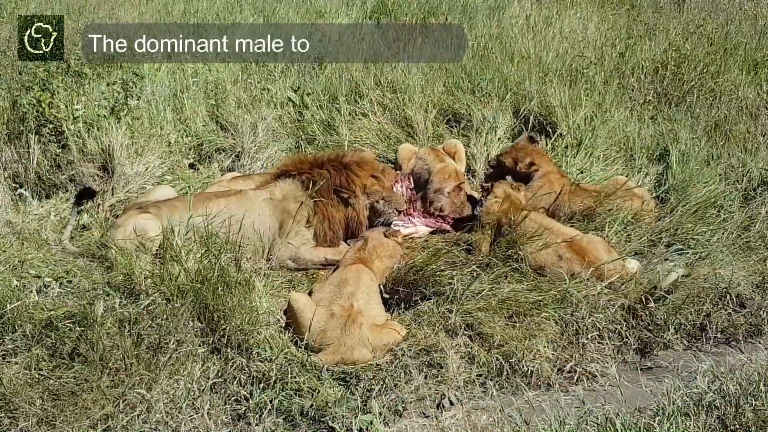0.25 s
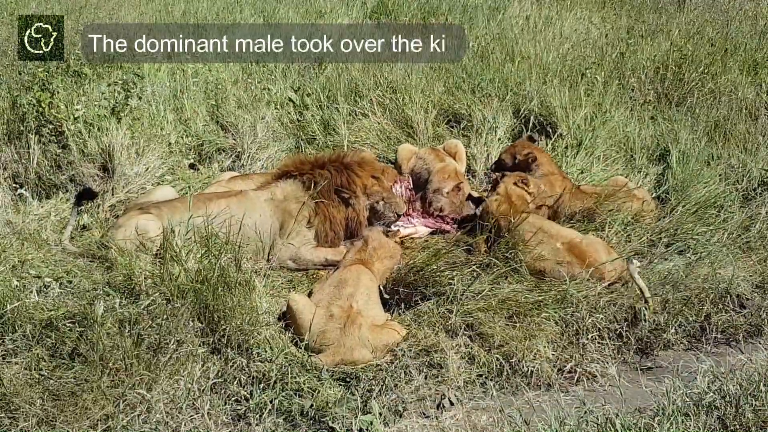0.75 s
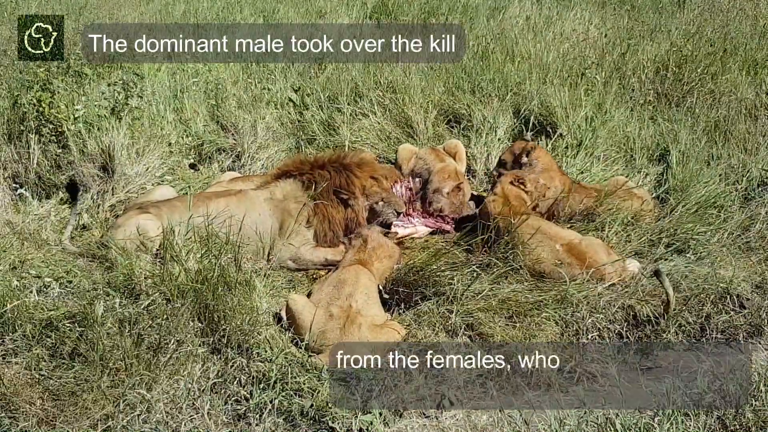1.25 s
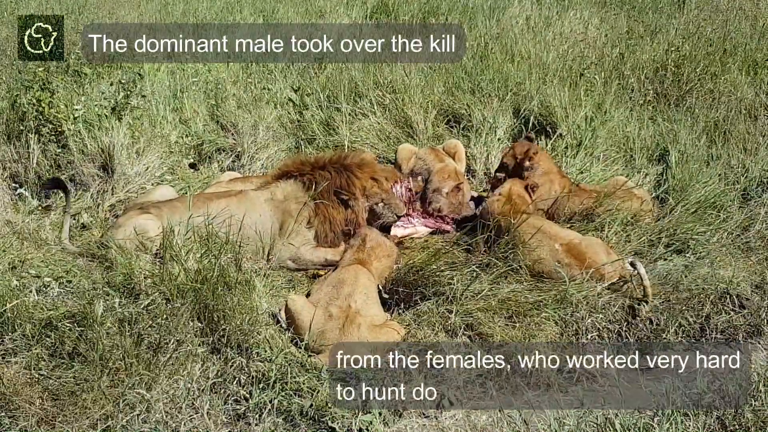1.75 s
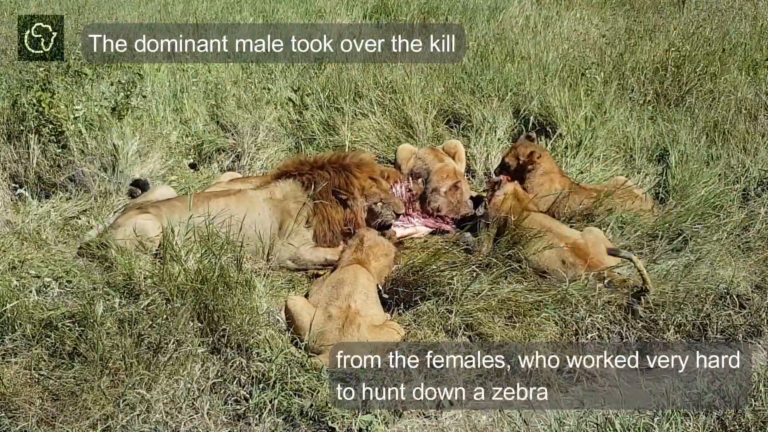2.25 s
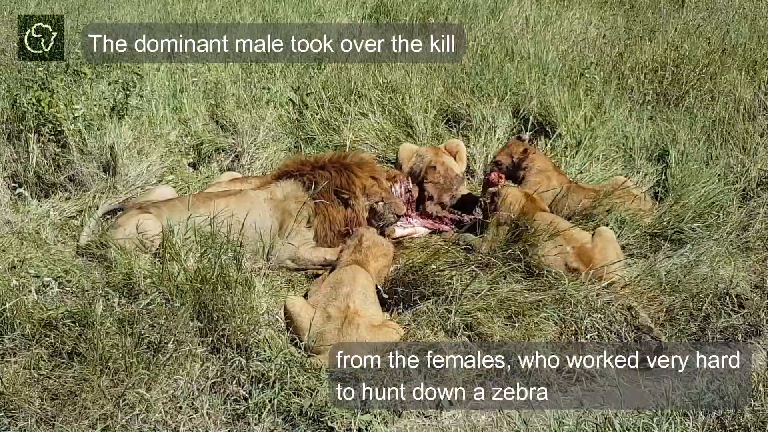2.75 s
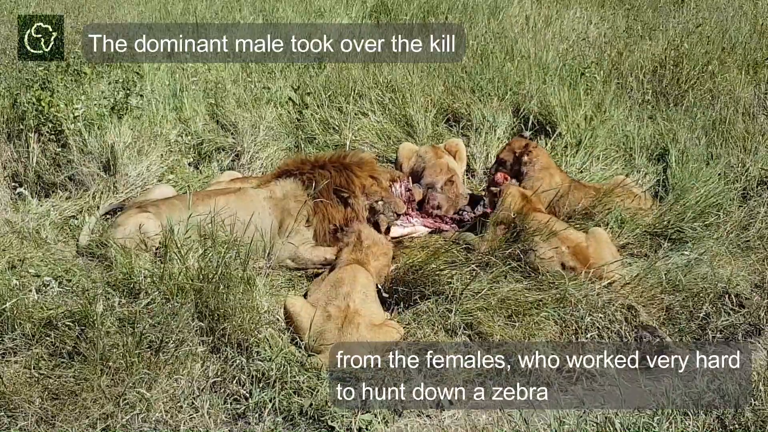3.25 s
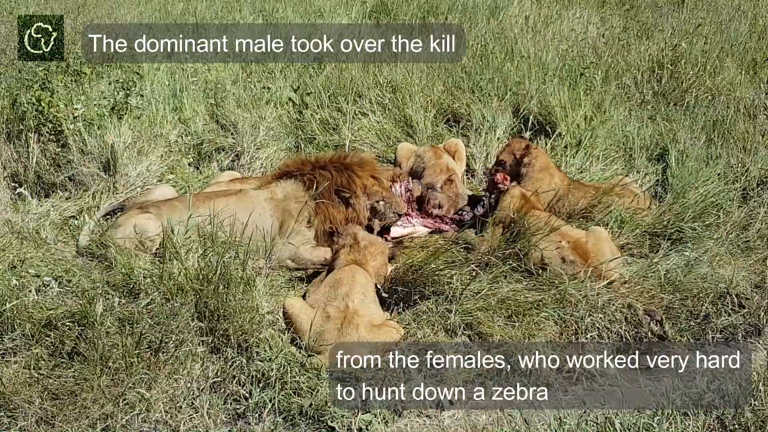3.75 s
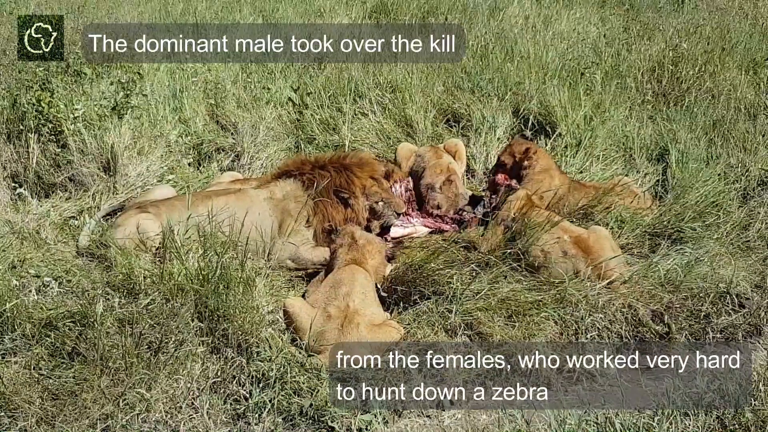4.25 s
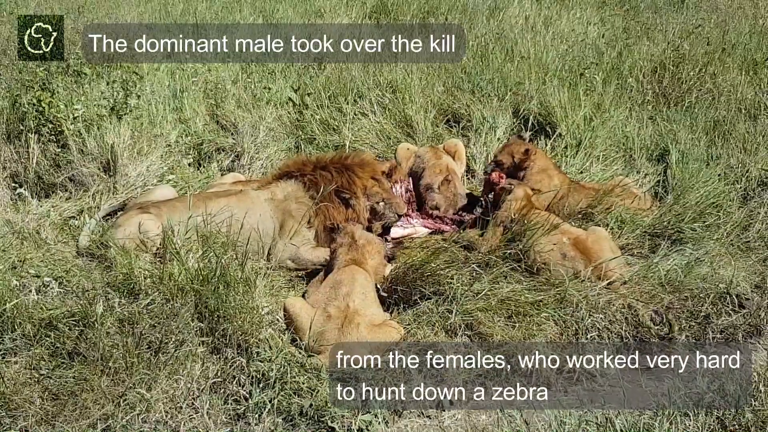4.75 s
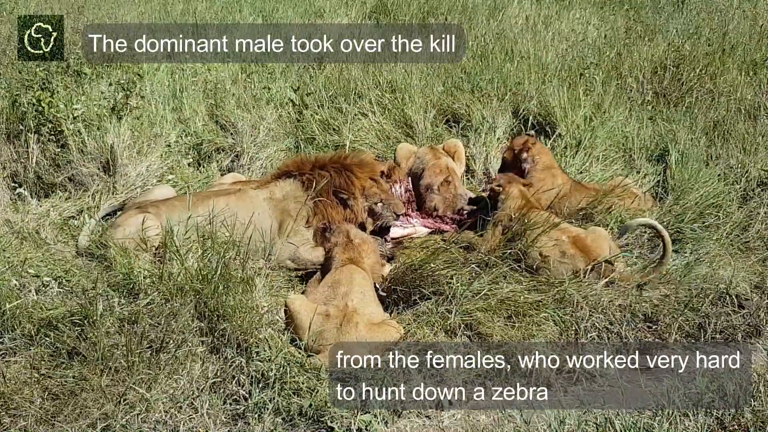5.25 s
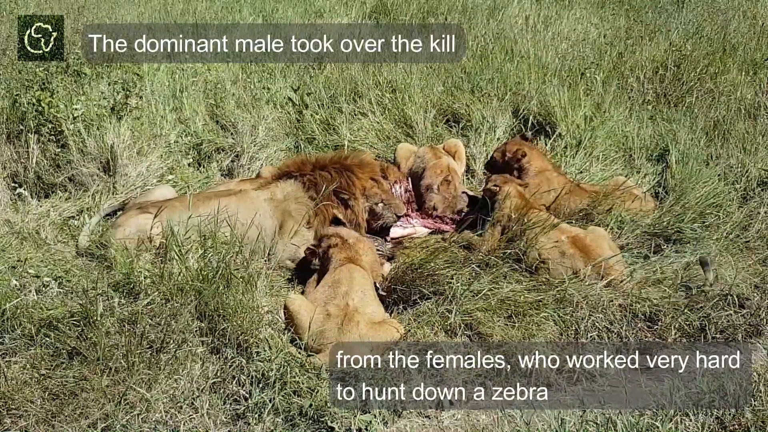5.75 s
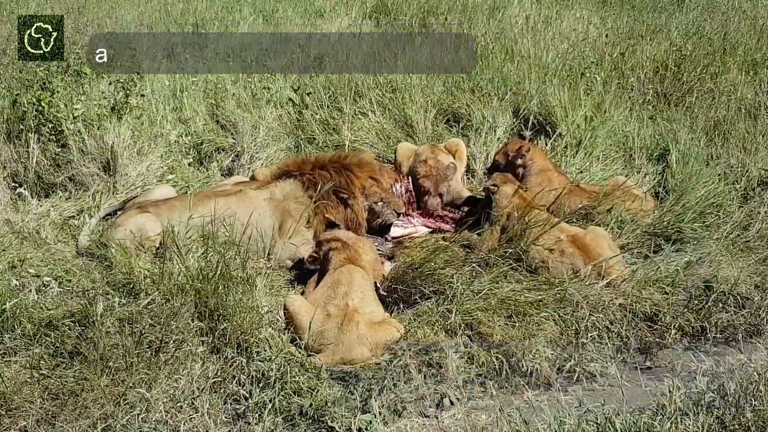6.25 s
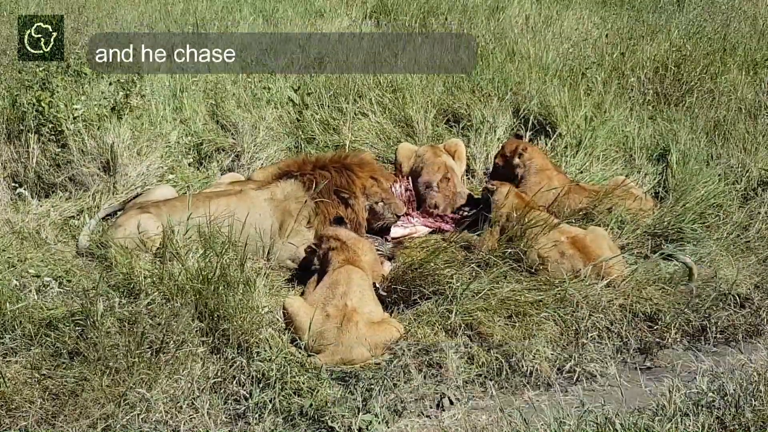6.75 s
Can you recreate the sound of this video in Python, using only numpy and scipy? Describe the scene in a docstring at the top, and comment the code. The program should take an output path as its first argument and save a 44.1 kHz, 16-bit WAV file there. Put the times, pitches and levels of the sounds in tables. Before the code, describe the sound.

Low rough feeding growls with hoarse snorts and faint crunches in open grassland, wind thumping at the start and strongest at the end.

```python
"""Lions growl over a carcass in open grassland, some way from a two-channel microphone.
At first wind buffets the microphone and a small far bird chirps; then the first growl comes, and about one a
second follows: some 21 throaty noise pulses a second ring throat, jaw and chest, amid hoarse snorts and crunches.
The wind, turbulent noise with thumping eddies, sinks to a lull, stirs again past the middle and ends strongest.
Dry grass rustles in noise swells; a second bird whistles past the middle, and an insect buzzes now and then."""
import sys
import numpy as np
from scipy import signal
from scipy.fft import rfft, irfft
from scipy.io import wavfile
from scipy.ndimage import uniform_filter1d

SR = 44100
rng = np.random.default_rng(int(sys.argv[2]) if len(sys.argv) > 2 else 0)


def output_pcm(signal):
    """Save a mono or channel-first signal as 16-bit PCM at the path in sys.argv[1].

    Samples are clipped to [-1, 1] before scaling.
    """
    pcm = np.clip(np.atleast_2d(signal).T, -1, 1) * 32767
    wavfile.write(sys.argv[1], SR, np.round(pcm).astype(np.int16))


N = 307818
TIME = np.arange(N) / SR

# Upper resonances of throat and mouth, one table a growl; levels are relative, the pulses widen the rings a little.
# Columns: pitch_hz, width_hz, level_db
THROAT_SHAPE_1 = [(934, 50, -2.5), (1163, 38, -4), (1317, 34, -6), (1696, 41, -12), (2040, 144, -23.5),
                  (2700, 43, -39)]
THROAT_SHAPE_2 = [(1004, 200, 13), (1316, 21, 15.5), (1620, 43, -19), (2170, 100, -4.5), (2770, 83, -5.5)]
THROAT_SHAPE_3 = [(973, 107, 23.5), (1333, 20, 20), (1494, 100, 10), (1774, 170, 7), (2360, 120, -41)]
THROAT_SHAPE_4 = [(1010, 48, 5), (1610, 100, -7.5), (1790, 91, -10), (2440, 21, -17), (3090, 85, -27)]
THROAT_SHAPE_5 = [(937, 180, -1), (1455, 140, -8), (1510, 15, -9), (1710, 110, -12.5), (2155, 65, -15),
                  (3280, 30, -16.5)]
THROAT_SHAPE_6 = [(986, 72, 4.5), (1470, 89, -3.5), (1690, 75, -10.5), (2145, 18, -11), (2550, 370, -22)]
THROAT_SHAPE_7 = [(914, 46, 11.5), (1050, 12, 11.5), (1330, 130, 4.5), (1650, 240, -6), (2090, 32, 0.5),
                  (2900, 95, -24)]
# Growls, one for each throat shape; levels are before the trims of each part of the voice.
# Columns: start_s, strongest_pulse_s, release_s, pulses_per_s, peak_db, fade_db_per_s,
# first_resonance_db, first_resonance_hz, chest_db
GROWL_TIMES = [(0.212, 0.283, 0.585, 22.3, -29.5, 31.5, -41.5, 377, -49),
               (1.234, 1.324, 1.605, 21.9, -35.5, 12.5, -51.5, 420, -49.5),
               (2.24, 2.337, 2.612, 20.6, -37, 26.5, -53, 418, -51),
               (3.302, 3.387, 3.575, 20.6, -38.5, 13, -46, 471, -51),
               (4.325, 4.377, 4.67, 20.15, -36, 31, -47.5, 411, -50),
               (5.305, 5.355, 5.615, 20.5, -34.5, 25, -48.5, 439, -50.5),
               (6.148, 6.277, 6.52, 22.45, -36, 27, -52.5, 337, -60)]


def growls():
    """About one growl a second, each with the mouth held in another shape."""
    shapes = [THROAT_SHAPE_1, THROAT_SHAPE_2, THROAT_SHAPE_3, THROAT_SHAPE_4,
              THROAT_SHAPE_5, THROAT_SHAPE_6, THROAT_SHAPE_7]
    out = np.zeros(N)
    for growl, shape in zip(GROWL_TIMES, shapes):
        out += rattle(growl, shape)
        add(out, growl[0], rasp(growl, shape))
    return out


JAW_SINK_PER_S, JAW_SCATTER = 0.35, 0.054  # log pitch: sinks as the jaw closes, strays from pulse to pulse
UNEVEN_DB, UNEVEN_S = -0.5, .0005  # pulses differ a little in strength and timing


def rattle(growl, shape, upper_db=-15, hiss_db=-27, throat_stray=0.018, damping_hz=12, colour_db=3.0,
           first_follow=0.68, first_width_hz=60,
           chest_trim_db=-4, chest_hz=128, chest_width_hz=50, chest_follow=0.21, lead_s=.0025):
    """Every pulse rings the upper throat, the first resonance (which moves with the jaw) and the chest."""
    start, crest, release, rate, peak_db, fade, first_db, first_hz, chest_db = growl
    out = np.zeros(N)
    t = np.arange(-.025, .1, 1 / SR)
    early = (t > 0) & (t < .03)  # the stretch that sets each part's strength
    beats = crest + np.arange(-3, 11) / rate
    beats = beats[(beats > start) & (beats < release + 1.5 / rate)]
    for s in beats:
        push_db = effort(s, start, crest, release, fade) + UNEVEN_DB * rng.standard_normal()
        jaw_hz = first_hz * np.exp(JAW_SCATTER * rng.standard_normal() - JAW_SINK_PER_S * (s - crest))
        # the throat's resonances stray a little at random from pulse to pulse
        throat = []
        for hz, width, db in shape:
            stray_hz = hz * (1 + throat_stray * rng.standard_normal())
            throat.append((stray_hz, width + damping_hz, db + colour_db * rng.standard_normal()))
        drive = throat_pulse(t)
        upper = band(resonate(drive, throat), 864, 2930, order=4)
        hiss = band(drive, 1130, 8300)  # air past the teeth
        jaw_ring = resonate(drive, [(jaw_hz, first_width_hz, 0)])
        steady_ring = resonate(drive, [(321, 35, -13.5), (482, 110, -21.5)])
        first = band(jaw_ring + steady_ring, 256, 550, order=4)
        chest = band(resonate(drive, [(chest_hz, chest_width_hz, 0)]), 69, 144)
        mouth = upper / np.std(upper[early]) + amp(hiss_db) * hiss / np.std(hiss[early])
        pulse = amp(peak_db + upper_db + push_db) * mouth
        # jaw and chest follow the effort less than the mouth does
        pulse += amp(first_db + first_follow * push_db) * first / np.std(first[early])
        pulse += amp(chest_db + chest_trim_db + chest_follow * push_db) * chest / np.std(chest[early])
        add(out, s + t[0] - lead_s + UNEVEN_S * rng.standard_normal(), pulse)
    return out


def throat_pulse(t, slap=2.3, rise_s=0.00108, puff_s=0.01, leak=0.15, leak_s=0.05, lead_s=0.0083):
    """Air starts to leak, the slack folds let out a puff from t = 0 and slap just after; the leak dies away."""
    after = np.maximum(t, 0)
    puff = (1 - np.exp(-after / rise_s)) * np.exp(-after / puff_s)
    seep = leak * np.exp(-(t / np.where(t < 0, lead_s, leak_s)) ** 2)
    drive = (puff + seep) * rng.standard_normal(len(t))
    drive[np.searchsorted(t, 2 * rise_s)] += slap
    return drive


def rasp(growl, shape, rasp_db=-34, hoarse_db=-6, drone_db=-16, drone_width_hz=110, rumble_db=-3.0,
         rumble_fade_db_per_s=20, rumble_low_hz=30, rumble_high_hz=160, rough_db=3.0):
    """Under and between the pulses air scrapes unevenly through the throat, over a deep rumble of the chest."""
    start, crest, release, _, peak_db, fade, first_db, first_hz, chest_db = growl
    t = np.arange(start, release + .25, 1 / SR)
    air = rng.standard_normal(len(t)) * amp(rough_db * wander(43, size=len(t)))
    throat = unit(band(resonate(air, shape), 800, 4700, order=4))
    scrape = throat + amp(hoarse_db) * unit(band(air, 550, 2670, order=3))
    drone = unit(band(resonate(air, [(first_hz, drone_width_hz, 0)]), 267, 625, order=3))
    rumble = unit(band(air, rumble_low_hz, rumble_high_hz, order=4))
    voice = amp(peak_db + rasp_db) * scrape + amp(first_db + drone_db) * drone
    voice *= amp(effort(t, start, crest, release, fade))
    rumble_effort_db = effort(t, start, crest, release, rumble_fade_db_per_s)
    return voice + amp(chest_db + rumble_db + rumble_effort_db) * rumble


SWELL_DB, SWELL_SHAPE, RELEASE_DB_PER_S = 24, 2.6, 247  # effort swells to the strongest pulse, then is let go
ACCENT_DB, ACCENT_S = 5, .04  # the extra shove around the strongest pulse


def effort(t, start, crest, release, fade_db_per_s):
    """A growl's effort in dB: swell, a shove at the crest, slow fade, quick release."""
    early = np.maximum(crest - t, 0) / max(crest - start, 1e-3)
    swell = -SWELL_DB * early ** SWELL_SHAPE
    shove = ACCENT_DB * np.exp(-((t - crest) / ACCENT_S) ** 2)
    fade = fade_db_per_s * np.maximum(t - crest, 0)
    let_go = RELEASE_DB_PER_S * np.maximum(t - release, 0)
    return swell + shove - fade - let_go


# Snorts of air through the muzzle, and the raspy tail of the fourth growl (rows at 3.532 and 3.66),
# with the main resonance; levels are before the trim and flutter.
# Columns: start_s, length_s, level_db, pitch_hz, width_hz
BREATH_TIMES = [(0.733, 0.13, -66, 916, 191), (1.024, 0.076, -62.5, 1480, 1350),
                (1.841, 0.14, -70.5, 800, 505), (2.945, 0.3, -64, 473, 640),
                (2.977, 0.14, -72.5, 2130, 350), (3.532, 0.2, -58.5, 1270, 587),
                (3.66, 0.04, -56, 540, 202), (4.086, 0.087, -60.5, 1380, 600),
                (4.672, 0.048, -59.5, 1470, 450), (5.123, 0.18, -66.5, 523, 890),
                (5.744, 0.16, -72.5, 1360, 1000)]


def snorts_and_raspy_tail(trim_db=-4, flutter_db=2.5, hoarse_db=-14):
    """Rushing air, in snorts and in one growl's raspy tail: one main resonance over a broad hoarse hiss."""
    out = np.zeros(N)
    for s, length, db, hz, width in BREATH_TIMES:
        u = np.linspace(0, 1, round(length * SR))
        air = band(rng.standard_normal(len(u)), 220, 4300)
        ring = air
        for _ in range(2):  # rung twice for steeper sides
            ring = resonate(ring, [(hz, width, 0)])
        swell = np.sin(np.pi * u ** .8).clip(0) ** 1.2
        breath = unit(ring) + amp(hoarse_db) * unit(air)
        add(out, s, amp(db + trim_db) * unit(breath * swell))
    return out * amp(flutter_db * wander(62))


# Crunches of feeding; levels are for the crackle, before the jaw's knock joins it.
# Columns: start_s, length_s, level_db
CRUNCH_TIMES = [(0.363, 0.032, -54.5), (0.644, 0.0078, -72), (3.915, 0.012, -67.5), (4.085, 0.12, -74),
                (5.812, 0.015, -70)]
# Resonances that the crackle rings; levels are relative. Columns: pitch_hz, width_hz, level_db
CRUNCH_RESONANCES = [(3570, 180, -12), (4630, 50, 11), (5100, 87, -16), (6400, 1400, -4), (7940, 160, -3.5)]


def crunches(spread_db=-1, jaw_hz=830, jaw_width_hz=90, jaw_db=-2):
    """Teeth tear the carcass: short bursts of dense crackle that also knock in the jaw."""
    out = np.zeros(N)
    for s, length, db in CRUNCH_TIMES:
        size = round(length * SR)
        taper = signal.windows.tukey(size, .5)
        crackle = rng.standard_normal(size) ** 3 * taper  # cubing makes the noise spiky
        snap = unit(resonate(crackle, CRUNCH_RESONANCES)) + amp(spread_db) * unit(band(crackle, 2350, 9900))
        knock = unit(resonate(crackle, [(jaw_hz, jaw_width_hz, 0)]) * taper)
        add(out, s, amp(db) * (unit(snap) + amp(jaw_db) * knock))
    return out


# Strength of the wind at the microphone, before the trim. Columns: time_s, level_db
WIND_LEVEL = [(0.0, -38.5), (0.25, -34.5), (0.67, -44), (0.72, -60.5), (0.84, -52.5), (1.65, -60.5),
              (1.76, -78.5), (2.9, -81), (2.96, -62), (3.66, -57.5), (3.76, -42), (3.92, -62),
              (4.04, -52.5), (4.64, -47.5), (4.77, -66), (5.08, -72.5), (5.35, -57.5), (5.77, -55),
              (6.09, -41.5), (6.24, -36.5), (6.33, -52.5), (6.51, -38), (6.6, -46.5), (6.7, -30.5),
              (6.81, -50), (6.92, -40.5)]
# Spectrum of the turbulence, relative, before it slides with the gusts. Columns: pitch_hz, level_db (per Hz)
WIND_SPECTRUM = [(12, -45), (20, -16.5), (64, 7), (139, 4.5), (172, -4.5), (273, -8), (304, -5.5),
                 (403, -9), (675, -27.5), (1400, -45), (1820, -77), (3080, -120)]


def wind(trim_db=1.23, lumpy_db=5.5, brighten_per_db=0.015, typical_db=-42, top_hz=1000):
    """Turbulence at each port; a stronger gust holds smaller eddies, so its spectrum slides up."""
    hz, t, z = signal.stft(noise_pair(0.5), SR, nperseg=2048, noverlap=1536)
    hz = hz[:, None]
    stretch = np.exp(brighten_per_db * (curve(WIND_LEVEL, t) - typical_db)).clip(.62, 1.1)
    colour = spectrum(WIND_SPECTRUM, hz / stretch) / (1 + (hz / top_hz) ** 4)
    roar = signal.istft(z * colour, SR, nperseg=2048, noverlap=1536)[1][:, :N]
    lumps = wander(35) + np.array([wander(48), wander(63)])  # partly shared by the two ports
    roar *= amp(lumpy_db * lumps / np.sqrt(2))
    # the lumps are quick; over longer spans the gust alone sets the strength
    roar /= np.sqrt(uniform_filter1d(np.mean(roar ** 2, axis=0), size=3000))
    return amp(curve(WIND_LEVEL) + trim_db) * roar * pan(1.0)


# The strongest eddies that thump the microphone; levels are before the trim, side_db is left over right.
# Columns: time_s, level_db, pitch_hz, side_db
STRONG_EDDIES = [(0.122, -21, 227, 2), (0.162, -24.5, 260, 0.5), (0.26, -25.5, 217, 3),
                 (0.461, -30, 283, -2), (0.673, -35, 117, -3), (0.929, -38, 129, 1), (1.038, -35.5, 116, 2),
                 (1.132, -32.5, 150, 0), (3.177, -40.5, 160, 5), (3.733, -31, 166, 5), (4.02, -35, 307, 12),
                 (4.06, -32.5, 106, 4), (4.113, -36, 374, 12.5), (4.187, -35.5, 316, 17.5),
                 (4.22, -38, 487, 8.5), (5.85, -33, 115, 5), (6.225, -30.5, 269, 6.5), (6.504, -30, 228, 5),
                 (6.658, -22.5, 189, 7.5), (6.714, -23, 223, 2)]


def eddies(trim_db=-3, spread_s=0.0003, wake_db=-7, wake_s=0.014):
    """An eddy pushes, then pulls on each port, not quite at the same moment, in a brief swirl of turbulence."""
    out = np.zeros((2, N))
    t = np.arange(-2205, 2205) / SR
    for s, db, hz, side_db in STRONG_EDDIES + small_eddies():
        u = 2 * np.pi * hz * (t - spread_s * rng.uniform(-0.74, 1, (2, 1)))
        push = -u * np.exp((1 - u ** 2) / 2)
        turbulence = band(noise_pair(0.14, size=len(t)), 0.43 * hz, 1.516 * hz, order=3)
        swirl = unit(turbulence) * np.exp(-(t / wake_s) ** 2)
        add(out, s + t[0], amp(db + trim_db) * pan(side_db) * (push + amp(wake_db) * swirl))
    return out


def small_eddies(count=40, over_wind_db=5, low_hz=70, high_hz=190, most_side_db=4):
    """Lesser eddies arrive by chance, as strong as the wind of the moment."""
    rows = []
    for u, v, w in rng.random((count, 3)):
        s = u * N / SR
        level_db = curve(WIND_LEVEL, s) + over_wind_db
        rows.append((s, level_db, low_hz + (high_hz - low_hz) * v, most_side_db * (2 * w - 1)))
    return rows


# Rising chirps of a small far bird; levels are before the trim and flicker. Columns: start_s, level_db
CHIRP_TIMES = [(0.135, -56.5), (0.935, -59), (1.72, -64), (3.364, -59.5), (4.145, -53.5), (4.926, -63),
               (5.745, -62.5), (6.585, -59)]
CHIRP_S, CHIRP_FROM_HZ, CHIRP_TO_HZ, CHIRP_GLIDE_S = 0.051, 5200, 8580, 0.026  # shoots up, bending toward the top


def chirps(trim_db=-12.5, waver=0.024):
    """One bird chirps upward: a near-pure tone whose pitch wavers as it glides."""
    out = np.zeros(N)
    t = np.arange(0, CHIRP_S, 1 / SR)
    glide_hz = CHIRP_TO_HZ + (CHIRP_FROM_HZ - CHIRP_TO_HZ) * np.exp(-t / CHIRP_GLIDE_S)
    for s, db in CHIRP_TIMES:
        pitch = glide_hz * (1 + waver * wander(410, size=len(t)))
        level = amp(db + trim_db) * np.sqrt(np.sin(np.pi * t / CHIRP_S))
        add(out, s, level * np.sin(2 * np.pi * np.cumsum(pitch) / SR))
    return out


# A second far bird's sinking whistles; levels are for the end of the swell, before the trim and flicker.
# Columns: start_s, length_s, pitch_hz, extra_pitch_at_start_hz, sink_hz_per_s, level_db
WHISTLE_TIMES = [(4.744, 0.36, 3483, 618, 1290, -73.5), (5.227, 0.25, 3410, -260, 683, -75)]


def whistles(trim_db=-3, settle_s=0.044, swell_db=6):
    """The other bird whistles: a pure tone that settles in pitch, then sinks as it grows louder."""
    out = np.zeros(N)
    for s, length, hz, extra_hz, sink_hz_per_s, db in WHISTLE_TIMES:
        t = np.arange(0, length, 1 / SR)
        pitch = hz + extra_hz * np.exp(-t / settle_s) - sink_hz_per_s * t
        level = amp(db + trim_db - swell_db * (1 - t / length)) * signal.windows.tukey(len(t), .35)
        add(out, s, level * np.sin(2 * np.pi * np.cumsum(pitch) / SR))
    return out


def birds(flicker_db=4.2):
    """Both far birds, under one quick flicker of level."""
    return (chirps() + whistles()) * amp(flicker_db * wander(60))


# Swishes of dry grass as the lions shift and flick their tails. Columns: middle_s, half_length_s, level_db
SWISH_TIMES = [(0.05, 0.34, -69.5), (0.42, 0.14, -64), (1.42, 0.17, -72), (1.94, 0.065, -67.5),
               (2.42, 0.2, -68), (5.7, 0.57, -73.5)]
# Spectrum of the rubbing stems, relative. Columns: pitch_hz, level_db (per Hz)
GRASS_SPECTRUM = [(1470, -21), (2500, -7.5), (4010, -7), (4970, -3), (5790, -11.5), (6440, -6),
                  (11100, -6.5), (15500, -21.5)]


def dry_grass(stir_db=-81, grain_db=1.0):
    """Dry stems rub: grainy noise, swelling with each swish over a faint constant stir."""
    stems = coloured(noise_pair(0.39) * amp(grain_db * wander(620)), GRASS_SPECTRUM)
    return np.hypot(amp(stir_db), swells(SWISH_TIMES)) * stems


# A faint high insect buzz. Columns: middle_s, half_length_s, level_db
BUZZ_TIMES = [(2.46, 0.2, -70), (5.72, 0.36, -72.5), (6.96, 0.12, -71.5)]


def insect():
    """An insect's buzz: a high band of noise in smooth swells."""
    return swells(BUZZ_TIMES) * unit(band(noise_pair(0.66), 7700, 13400))


# Spectrum of the open air, relative. Columns: pitch_hz, level_db (per Hz)
AIR_SPECTRUM = [(18, -36), (30, 2.5), (81, -8), (709, -9), (2130, -12), (2760, -12), (3150, -11.5),
                (3680, -14), (7650, -13), (15500, -15.5)]


def far_air(level_db=-72):
    """Steady far hiss of the grassland: coloured noise, partly alike in both channels."""
    return amp(level_db) * coloured(noise_pair(0.32), AIR_SPECTRUM)


def open_ground(x, scatter_db, scatter_t60):
    """Ground and grass scatter the sound briefly, differently to each side; scatter_t60 is in seconds."""
    t = np.arange(SR // 2) / SR
    echo = rng.standard_normal((2, len(t))) * (t > .001) * amp(-60 * t / scatter_t60)
    echo /= np.linalg.norm(echo[0])
    return x + amp(scatter_db) * signal.fftconvolve(x[None], echo, axes=1)[:, :N]


def amp(db):
    """Decibels to gain."""
    return 10 ** (np.asarray(db) / 20)


def unit(x):
    """Scales to rms 1."""
    return x / np.sqrt(np.mean(x ** 2) + 1e-24)


def curve(rows, t=TIME, column=1):
    """Joins the rows of a table by straight lines in time."""
    rows = np.asarray(rows)
    return np.interp(t, rows[:, 0], rows[:, column])


def swells(rows):
    """Gain of smooth swells, from rows of middle_s, half_length_s, level_db."""
    power = sum(amp(db) ** 2 * np.exp(-2 * ((TIME - s) / half) ** 2) for s, half, db in rows)
    return np.sqrt(power)


def spectrum(points, hz):
    """Gain of a spectrum table, joined on a log-frequency axis."""
    f, db = np.transpose(points)
    return amp(np.interp(np.log(hz + 1), np.log(f + 1), db))


def coloured(x, points):
    """Gives a long noise a spectrum, at rms 1."""
    return unit(irfft(rfft(x) * spectrum(points, np.fft.rfftfreq(N, 1 / SR)), N))


def noise_pair(likeness, size=N):
    """White noise in two channels that share a part."""
    shared = rng.standard_normal(size)
    return np.sqrt(likeness) * shared + np.sqrt(1 - likeness) * rng.standard_normal((2, size))


def wander(rate_hz, size=N):
    """Random drift of rms 1, mostly slower than rate_hz."""
    smoothing = 1 + (np.fft.rfftfreq(size, 1 / SR) / rate_hz) ** 4
    return unit(irfft(rfft(rng.standard_normal(size)) / smoothing, size))


def band(x, low_hz, high_hz, order=2):
    """Causal band-pass."""
    edges = [low_hz, min(high_hz, SR / 2 - 1)]
    return signal.sosfilt(signal.butter(order, edges, "band", fs=SR, output="sos"), x)


def resonate(x, modes):
    """Parallel resonances (pitch_hz, width_hz, level_db) of alternating sign, as along a tube."""
    out = 0
    for k, (hz, width, db) in enumerate(modes):
        b, a = signal.iirpeak(hz, hz / width, SR)
        out = out + (-1) ** k * amp(db) * signal.lfilter(b, a, x)
    return out


def pan(db):
    """Left and right gains for a level difference, left over right."""
    return amp(np.array([[db], [-db]]) / 2)


def add(mix, s, sound):
    """Mixes a sound in at time s."""
    part = mix[..., max(round(s * SR), 0):][..., :sound.shape[-1]]
    part += sound[..., :part.shape[-1]]


def scene():
    """Lions and birds across the grass, wind at the microphone."""
    lions = open_ground(growls() + snorts_and_raspy_tail() + crunches(), scatter_db=-6.5, scatter_t60=0.069)
    far_birds = open_ground(birds(), scatter_db=-0.5, scatter_t60=0.11)
    grassland = dry_grass() + insect() + far_air()
    return lions * pan(0.62) + wind() + eddies() + far_birds + grassland


def record(dry, bass_hz=22, cutoff_hz=15700):
    """The microphone's bass roll-off and the band limit."""
    thinned = signal.sosfilt(signal.butter(1, bass_hz, "high", fs=SR, output="sos"), dry)
    padded = np.pad(thinned, ((0, 0), (255, 255)), "reflect")
    low_pass = signal.firwin(511, cutoff_hz, window=("kaiser", 9), fs=SR)
    return signal.oaconvolve(padded, low_pass[None], "valid")


dry = scene()
out = record(dry)
output_pcm(out)
```